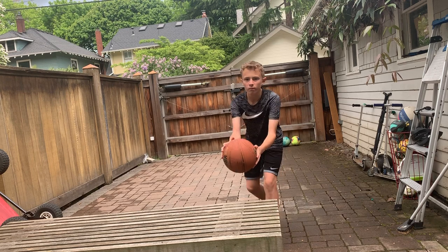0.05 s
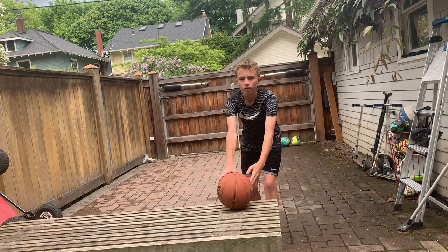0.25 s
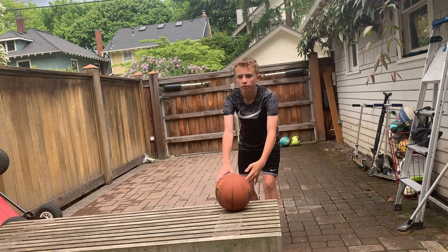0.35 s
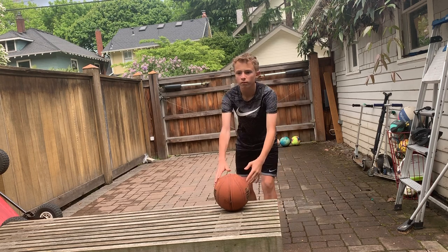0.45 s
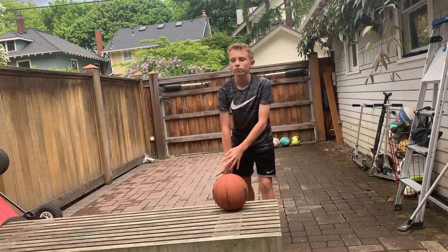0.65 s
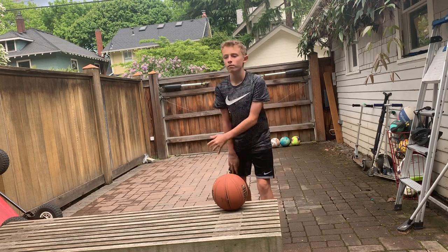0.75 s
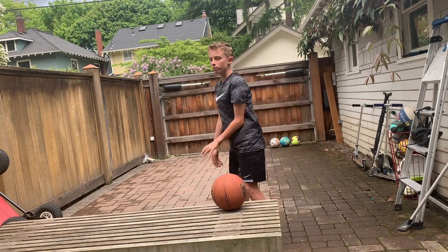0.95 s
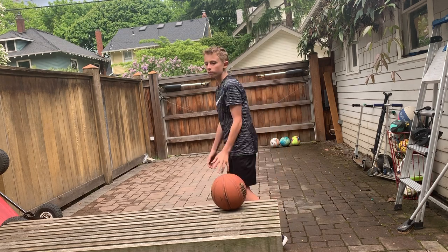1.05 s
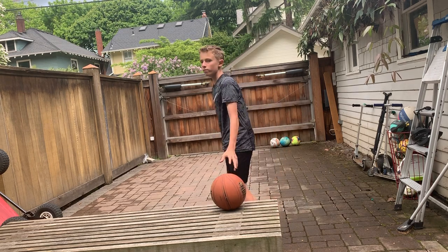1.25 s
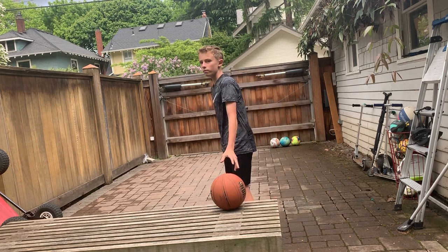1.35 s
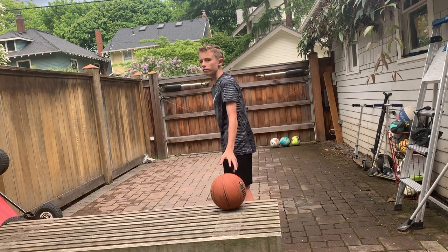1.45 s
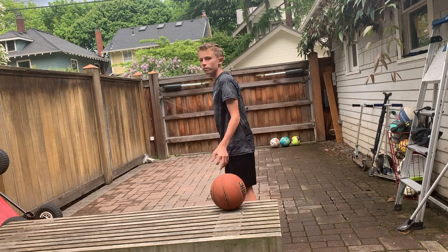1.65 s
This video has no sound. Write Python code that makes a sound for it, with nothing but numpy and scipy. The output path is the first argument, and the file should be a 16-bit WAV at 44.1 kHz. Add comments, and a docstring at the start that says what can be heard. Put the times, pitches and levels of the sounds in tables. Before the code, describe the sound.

A basketball thumps onto a wooden bench, followed by light shoe scuffs on brick.

```python
"""A quiet fenced yard, with a low distant rumble under it. A basketball is set down on a slatted
wooden bench: the skin slaps, the air inside pings, the slats ring and the bench thumps as the ball
settles in a few quick contacts. Hands brush it with a grainy friction. Then shoes scuff, tap and thud
on the brick paving and a bird gives one thin rising chirp. Fences, wall and paving add a short tail."""
import sys
import numpy as np
from scipy import signal
from scipy.fft import rfft, irfft
from scipy.io import wavfile
from scipy.ndimage import uniform_filter1d

SR = 44100
rng = np.random.default_rng(int(sys.argv[2]) if len(sys.argv) > 2 else 0)


def to_wav(s):
    """Save 16-bit WAV."""
    ch = np.atleast_2d(s).T  # columns
    pcm = np.round(np.clip(ch, -1, 1) * 32767)  # PCM
    wavfile.write(sys.argv[1], SR, pcm.astype(np.int16))


N = 74970
T = np.arange(N) / SR
FREQS = np.fft.rfftfreq(N, 1 / SR)

# stereo image of the ambience and reflections (frequency [Hz], left-right correlation [-1..1])
DIFFUSE_IMAGE = [(60, 0.92), (150, 0.92), (300, 0.78), (600, 0.15), (1500, 0), (5000, 0.055), (12000, 0)]
# stereo image of the close noises (frequency [Hz], left-right correlation [-1..1])
CLOSE_IMAGE = [(100, 0.95), (600, 0.77), (1500, 0.9), (4000, 0.33), (7000, -0.21), (11000, -0.12)]


def amp(db):
    """Decibels to gain."""
    return 10 ** (np.asarray(db) / 20)


def unit_rms(x):
    """Scales to rms 1."""
    return x / np.sqrt(np.mean(x ** 2) + 1e-20)


def curve_at(curve, hz):
    """Reads a (frequency [Hz], value) curve on a log-frequency axis."""
    knots_hz, values = np.transpose(curve)
    return np.interp(np.log(hz + 1), np.log(knots_hz + 1), values)


def equalise(x, eq):
    """Filters by a (frequency [Hz], level [dB]) curve."""
    return irfft(rfft(x) * amp(curve_at(eq, FREQS)), N)


def tight_pulse(eq):
    """The shortest (minimum-phase) pulse with this EQ curve."""
    log_gain = np.log(amp(curve_at(eq, abs(np.fft.fftfreq(4096, 1 / SR)))))
    return np.fft.ifft(np.exp(np.conj(signal.hilbert(log_gain)))).real[:2048]


def spread(pair, image):
    """Mixes two unrelated noises as mid and side, setting the stereo width by frequency."""
    correlation = np.clip(curve_at(image, FREQS), -.999, .999)
    mid, side = rfft(pair) * np.sqrt([(1 + correlation) / 2, (1 - correlation) / 2])
    return irfft(np.array([mid + side, mid - side]), N)


def envelope(start, rise, t60, decay_after=0):
    """Smooth attack and exponential decay; all times in seconds."""
    age = T - start
    attack = np.sin(np.pi / 2 * np.clip(age / rise, 0, 1)) ** 2
    return attack * 1000. ** (-np.maximum(age - decay_after, 0) / t60)


def mode(start, hz, db, t60, rise):
    """One dying resonance."""
    return amp(db) * envelope(start, rise, t60) * np.sin(2 * np.pi * hz * (T - start))


def clicks(per_second):
    """Stereo impulses of random timing and polarity."""
    return rng.choice([-1., 1.], (2, N)) * (rng.random((2, N)) < per_second / SR)


def convolve(x, response):
    """Convolution cut to the scene's length."""
    return signal.fftconvolve(np.atleast_2d(x), np.atleast_2d(response), axes=1)[:, :N]


def background():
    """A bed of distant rumble and hiss, its level drifting gently in patches of time and pitch."""
    # tone of the outdoor air (frequency [Hz], relative level [dB])
    air_eq = [(20, -54), (32, -23), (48, -4), (65, 0.5), (82, 0.5), (120, -2.5), (160, -8), (220, -12.5),
              (400, -16), (620, -19.5), (830, -16.5), (1300, -23.5), (2200, -32.5), (4900, -38.5),
              (7100, -46), (8650, -61.5), (10200, -45), (13300, -57), (15500, -53)]
    bed_db, drift_db = -37.5, 1.27
    noise = spread(equalise(rng.standard_normal((2, N)), air_eq), DIFFUSE_IMAGE)
    spectra = signal.stft(noise, nperseg=1024)[2]
    patches = uniform_filter1d(rng.standard_normal(spectra.shape[1:]), size=10, axis=0)  # across pitch
    patches = unit_rms(uniform_filter1d(patches, size=6, axis=1))  # across time
    bed = signal.istft(spectra * amp(drift_db * patches))[1][:, :N]
    return amp(bed_db) * unit_rms(bed)


def yard_reverb(send):
    """Scattered reflections from fences, wall and paving build quickly and die away."""
    # decay of the reflections (frequency [Hz], t60 [s])
    decay_times = [(100, 0.6), (500, 0.08), (1500, 0.42), (4000, 0.39), (10000, 0.09)]
    # tone of the reflections (frequency [Hz], level [dB])
    return_eq = [(60, -11), (200, 0), (500, 6.5), (1200, -1.5), (2000, -1.5), (4500, -1.5), (12000, 2.5)]
    predelay_s, build_s = 0.002, 0.0086
    reflections = spread(clicks(per_second=3000), DIFFUSE_IMAGE)
    hz, age, spectra = signal.stft(reflections, SR, nperseg=256)
    decay = amp(-60 * age / curve_at(decay_times, hz)[:, None])
    tail = signal.istft(spectra * decay)[1][:, :N]
    tail *= np.clip((T - predelay_s) / build_s, 0, 1)
    return equalise(convolve(send, tail / np.linalg.norm(tail[0])), return_eq)


def bird():
    """One thin rising chirp; a fast random pitch wobble makes its middle raspy."""
    start_s, length_s, level_db = 1.255, 0.069, -54
    from_hz, to_hz, rasp_cutoff_hz, rasp_depth = 5900, 6710, 300, 0.059
    progress = np.clip((T - start_s) / length_s, 0, 1)
    arch = np.sin(np.pi * progress)
    rasp = unit_rms(signal.lfilter(*signal.butter(2, rasp_cutoff_hz, fs=SR), rng.standard_normal(N)))
    glide_hz = from_hz + (to_hz - from_hz) * progress
    hz = glide_hz * (1 + rasp_depth * arch * rasp)
    return amp(level_db) * np.sqrt(abs(arch)) * np.sin(2 * np.pi * np.cumsum(hz) / SR)


def scuffs():
    """Hands rub the ball and soles rub brick: dense grains of friction swell, hold and die away."""
    # rubbing strokes (start [s], rise [s], hold [s], release t60 [s], level [dB], grit re rub [dB])
    strokes = [(0.176, 0.05, 0.074, .2, -33, -1), (0.903, 0.078, 0.045, 0.22, -46.5, 1.5),
               (1.024, 0.026, .022, 0.15, -45.5, -21), (1.332, 0.0068, 0.021, .2, -43.5, -14),
               (1.64, .03, .03, .2, -49.5, -8.5)]
    # body of the rubbing (frequency [Hz], relative level [dB])
    rub_eq = [(150, 19), (500, 0), (1500, -0.5), (3000, -4), (4500, -3), (7000, -3.5), (9000, -24.5),
              (16000, -37)]
    # its gritty top (frequency [Hz], relative level [dB])
    grit_eq = [(3000, 3), (6000, -1.5), (7300, 6), (8600, -11.5), (10300, 5.5), (12000, -2.5), (13500, -11),
               (15300, -5)]
    grain_spread_db, grain_mix = 3.5, 0.82
    sizes = amp(grain_spread_db * np.minimum(rng.exponential(1, (2, N)), 4))
    grains = unit_rms(sizes * clicks(per_second=1200))
    friction = spread(grain_mix * grains + rng.standard_normal((2, N)), CLOSE_IMAGE)
    rub = unit_rms(equalise(friction, rub_eq))
    grit = unit_rms(equalise(friction[:, ::-1], grit_eq))
    return sum(amp(db) * envelope(start, rise, t60, rise + hold) * (rub + amp(grit_db) * grit)
               for start, rise, hold, t60, db, grit_db in strokes)


def taps():
    """Fingers, shoes and grit tap and tick, each a noise burst in its own band."""
    # small hits (time [s], level [dB], centre [Hz], half-width [octaves], rise [s], t60 [s])
    hits = [(0.173, -41, 10800, 0.44, 0.0066, 0.32), (0.173, -41, 1900, .8, 0.0099, 0.19),
            (.617, -35.5, 7900, 1.3, 0.0025, 0.015), (.618, -40.5, 2400, 1.43, 0.0033, 0.066),
            (.728, -51.5, 11000, .6, .001, .015), (.752, -29.5, 1294, .28, 0.0021, 0.037),
            (.917, -32.5, 760, 0.52, 0.0028, 0.052), (.922, -41, 1970, 0.47, 0.0078, 0.075),
            (.926, -41.5, 10700, .25, 0.0041, .05), (.9875, -28, 9700, 0.3, 0.0011, 0.018),
            (.985, -32, 10500, 0.13, 0.013, 0.076), (.985, -41.5, 4200, 0.23, 0.027, .15),
            (1.048, -30.5, 1047, 0.061, 0.011, 0.071), (1.055, -40.5, 2100, 0.68, 0.019, 0.14),
            (1.333, -27.5, 315, 0.83, .0015, 0.053), (1.334, -46, 4230, 0.13, .012, 0.091),
            (1.638, -48, 10500, 0.22, 0.0034, 0.037), (1.667, -44.5, 4500, 0.59, .003, .04)]
    octaves = np.log2(FREQS + 1)
    out = np.zeros((2, N))
    for start, db, hz, half_width, rise, t60 in hits:
        band = 1 / (1 + ((octaves - np.log2(hz)) / half_width) ** 4)
        noise = irfft(rfft(rng.standard_normal((2, N))) * band, N)
        out += amp(db) * unit_rms(spread(noise, CLOSE_IMAGE)) * envelope(start, rise, t60)
    return out


def footfalls():
    """Feet land on the paving with dull, low thuds."""
    # thuds (time [s], level [dB], pitch [Hz])
    thuds = [(1.183, -19, 64.5), (1.191, -33.5, 230.5), (1.198, -26.5, 131.4), (1.269, -27, 64.5),
             (1.334, -29, 148), (1.388, -26.5, 109)]
    return sum(mode(start, hz, db, t60=0.14, rise=0.0082) for start, db, hz in thuds)


def ball_on_bench():
    """Each contact slaps the skin, rings the air inside and the slats, and thumps the bench."""
    # the ball lands and settles (time [s], slap gain [dB], ring gain [dB], thump gain [dB], softness [s])
    contacts = [(.2350, 1, 0, 0.5, .00005), (0.2522, -7, -22, -37, 0.0044),
                (0.271, -15, -31, -17.5, 0.00045), (0.282, -8, -19, -28, 0.0043),
                (0.2877, -8, -10.5, -35, 0.0015)]
    # tone of the skin slap (frequency [Hz], relative level [dB])
    slap_eq = [(100, -20.5), (300, -5.5), (600, -0.5), (1200, -12.5), (2500, 0), (4000, -3), (6000, -10),
               (8500, -23), (16000, -33)]
    # the slap direct, then reflected in the ball and off the bench top (delay [s], left gain, right gain)
    slap_paths = [(.0002, -1.22, -0.95), (.0013, -0.21, -0.86), (.0021, 0.74, 0.38)]
    # ping of the air inside the ball (frequency [Hz], level [dB], t60 [s])
    air_modes = [(1148, -8, .032), (1535, -15, 0.031), (1842, -13.5, 0.039), (2267, -14.5, 0.019),
                 (2806, -17.5, .022), (3160, -17.5, .018), (3290, -16, 0.014), (3970, -14.5, 0.025),
                 (4280, -31, 0.02), (4600, -31.5, 0.055), (5890, -37, 0.05)]
    # ring of the wooden slats (frequency [Hz], level [dB], t60 [s])
    slat_modes = [(313.5, -28.5, 0.047), (419, -22.5, 0.048), (468, -23, 0.099), (552, -12, 0.029),
                  (742, -13.5, 0.019), (827, -20, 0.023), (4540, -34, 0.18)]
    # low thump of the whole bench (frequency [Hz], level [dB], t60 [s], rise [s])
    bench_modes = [(65.6, -1.5, 0.11, 0.0264), (82, -14.5, .3, 0.035), (122.2, 2.5, 0.052, .021)]
    slap_boost_db, crackle_mix, crackle_t60 = 11, 0.15, 0.024
    attack_s, thump_lag_s = 0.00042, 0.000098
    skin_pulse = amp(slap_boost_db) * tight_pulse(slap_eq)
    out = np.zeros((2, N))
    for start, slap_db, ring_db, thump_db, softness in contacts:
        crackle = spread(rng.standard_normal((2, N)), CLOSE_IMAGE)
        blow = crackle_mix * crackle * envelope(start, attack_s, crackle_t60)
        for delay, left, right in slap_paths:
            blow[:, round((start + delay) * SR)] += left, right
        slap = convolve(blow, skin_pulse)
        ring = sum((-1) ** k * mode(start, hz, db, t60, attack_s)  # alternating polarity
                   for k, (hz, db, t60) in enumerate([*air_modes, *slat_modes]))
        push = np.exp(-2 * np.pi * T / softness)  # a softer contact pushes longer and sounds duller
        out += convolve(amp(slap_db) * slap + amp(ring_db) * ring, push / push.sum())
        out += amp(thump_db) * sum(mode(start + thump_lag_s, *row) for row in bench_modes)
    return out


def scene():
    """Close foley with a light reverb send and a much wetter bird, over the outdoor bed."""
    foley = ball_on_bench() + scuffs() + taps() + footfalls()
    chirp = bird()
    send = amp(-12) * foley + 0.99 * chirp
    return foley + chirp + yard_reverb(send) + background()


def record(dry):
    """Clips at full scale, then low-passes at 16 kHz."""
    lowpass = signal.firwin(401, 16000, window=("kaiser", 9), fs=SR)
    return signal.oaconvolve(np.clip(dry, -1, 1), lowpass[None], "same")


dry = scene()
out = record(dry)
to_wav(out)
```